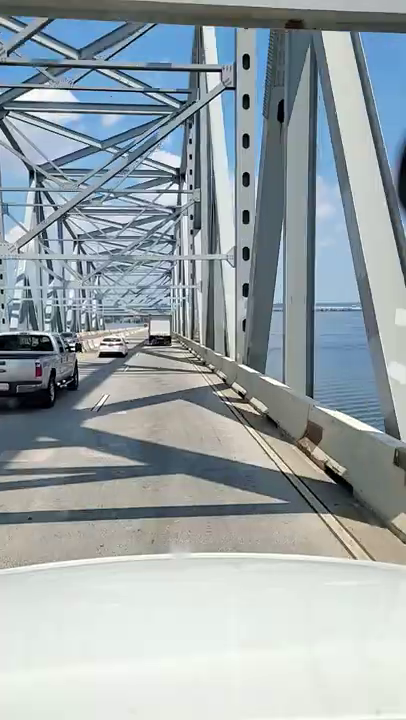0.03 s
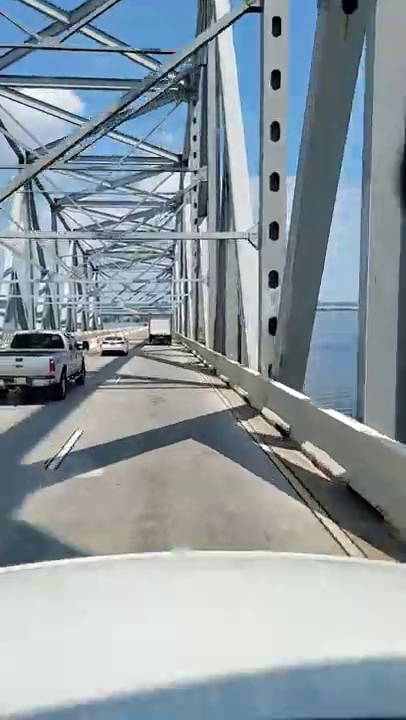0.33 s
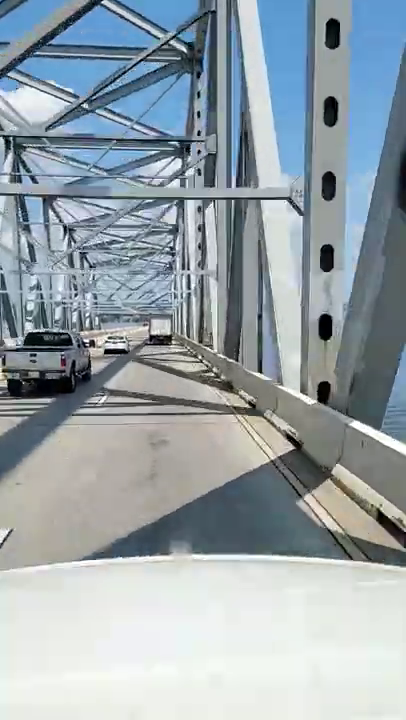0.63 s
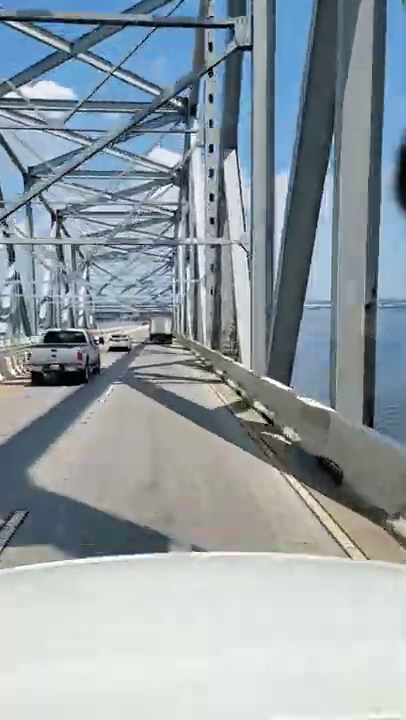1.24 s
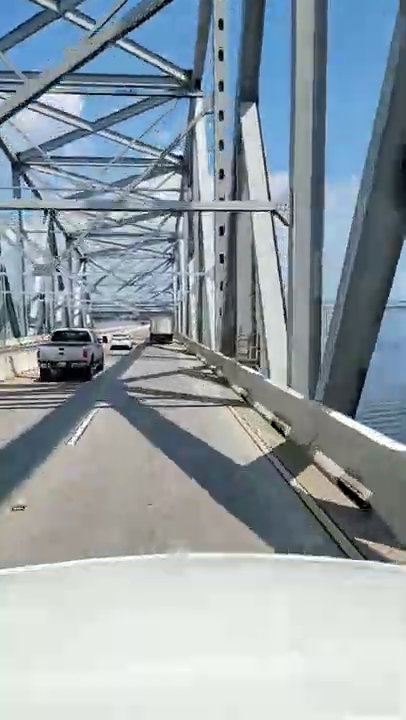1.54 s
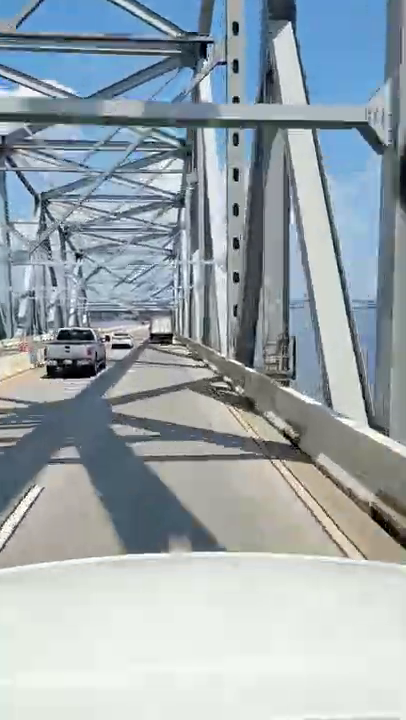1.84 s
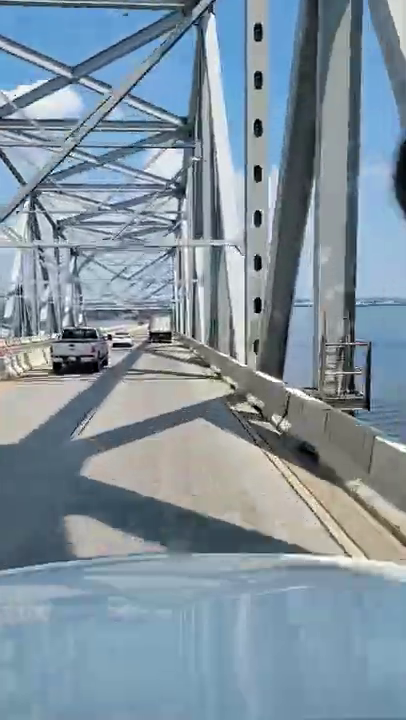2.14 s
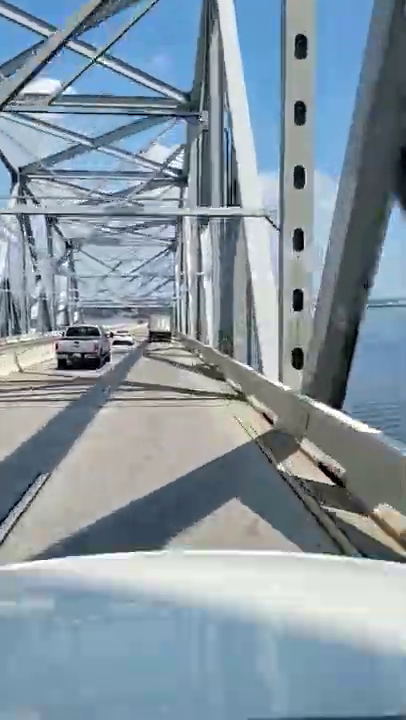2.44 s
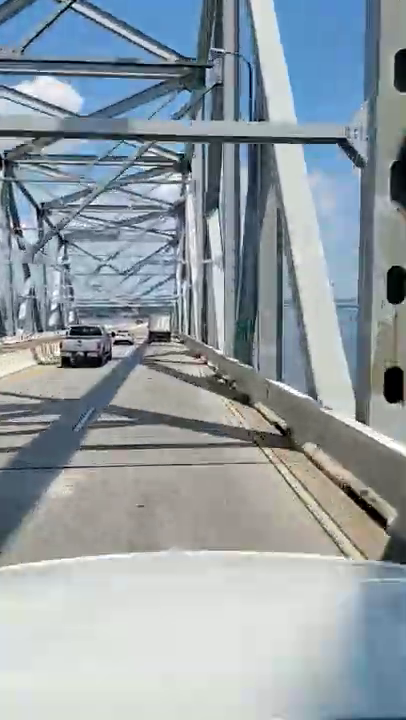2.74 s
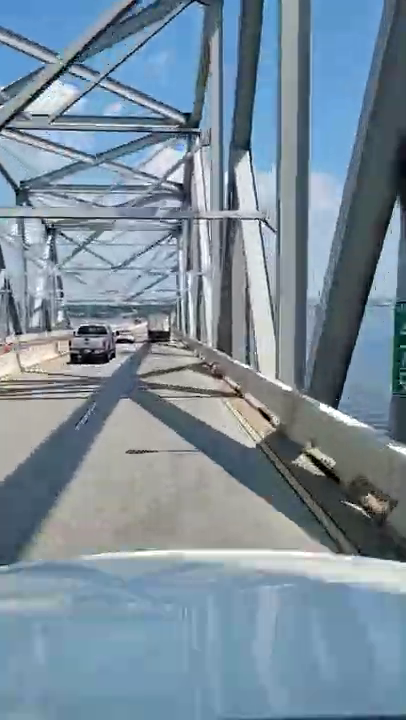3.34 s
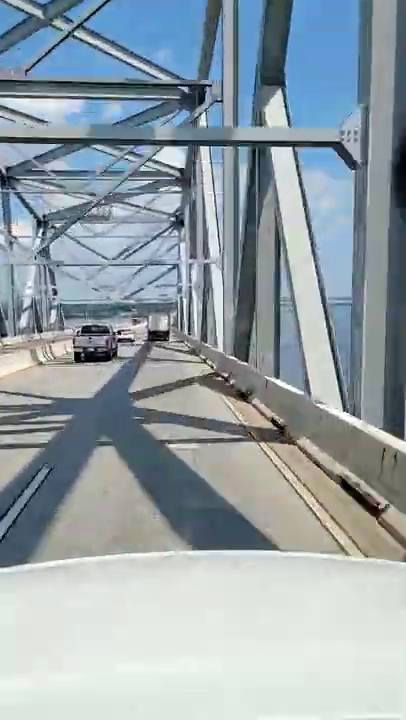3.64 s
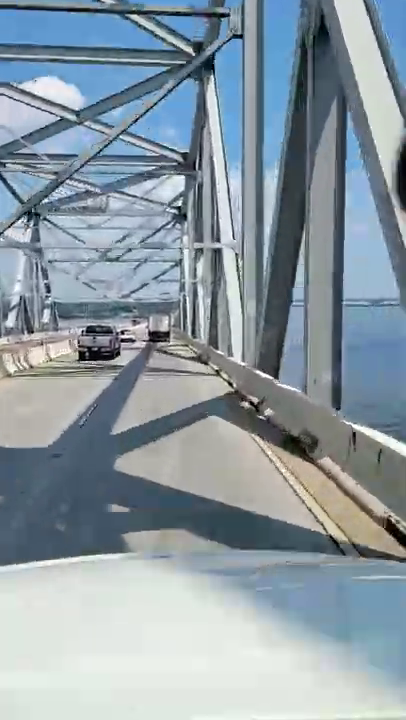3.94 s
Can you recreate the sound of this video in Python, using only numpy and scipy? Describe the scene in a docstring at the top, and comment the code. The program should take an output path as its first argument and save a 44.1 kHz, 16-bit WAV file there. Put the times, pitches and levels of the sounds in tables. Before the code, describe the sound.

From the front seat of a moving car, a low road rumble and engine drone run throughout. The tyres thump over bridge joints and hum briefly near the end, while faint swishes and small cabin clicks sit above.

```python
"""A deep road rumble and an engine drone fill a car that slowly gathers speed on a steel bridge.
The deck shakes the body through the tyres, which roar, ring faintly, hum on ribbed spots and thump
over joints; the drone follows the firing rate of the engine. Above that lie a thin hiss of air,
a run of brief swishes, soft rustles, faint clicks of the trim and one sharp tick in the cabin."""
import sys
import numpy as np
from scipy import signal
from scipy.fft import rfft, irfft
from scipy.io import wavfile
from scipy.ndimage import uniform_filter1d

SR = 44100
rng = np.random.default_rng(int(sys.argv[2]) if len(sys.argv) > 2 else 0)


def generate_wav(sig):
    """Save sig (samples, or channels by samples) to the path in sys.argv[1] as 16-bit PCM at SR."""
    pcm = np.round(np.clip(np.atleast_2d(sig).T, -1, 1) * 32767).astype(np.int16)
    wavfile.write(sys.argv[1], SR, pcm)


N = 176400
TIME = np.arange(N) / SR
HZ = np.maximum(np.arange(N // 2 + 1) * SR / N, 1)

# Cabin field, left-right coherence: f/Hz, coherence (-1..1)
COHERENCE = [(25,0.95),(60,1),(120,1),(240,1),(480,0.6),(950,-0.15),(1900,-0.19),(3800,-0.028),(15000,0.11)]
# Cabin field, balance: f/Hz, left minus right/dB
BALANCE = [(40,-3),(80,3),(150,-3.5),(250,0.5),(350,-1),(480,-4),(800,-3),(1400,-2),(2100,-4.5),(3300,0),(4000,1.5),(5100,3),(6600,0.5),(8300,6.5),(10200,-1),(15000,0)]

# Air hiss envelope: t/s, relative level/dB
HISS_LEVEL = [(0.1,-51.5),(0.35,-60),(0.64,-54.5),(0.78,-58.5),(0.92,-57.5),(1.06,-53),(1.35,-53),(2.3,-53),(3.0,-52),(3.76,-52),(3.85,-53.5),(4.0,-55.5)]
# Air hiss spectrum: f/Hz, relative level/dB
HISS_SPECTRUM = [(2000,-7),(3800,-1),(4400,-3),(4850,0),(5900,-1.5),(6600,1),(7600,-1),(9000,-3)]
# Envelope of the highest treble: t/s, level/dB
SIZZLE_LEVEL = [(0.1,-63),(0.2,-54.5),(0.27,-68),(0.45,-67.5),(0.64,-57.5),(0.76,-65),(0.87,-68),(0.94,-60),(1.05,-56),(1.15,-62),(1.75,-58.5),(1.85,-61),(2.6,-60.5),(3.2,-59),(3.7,-61),(3.82,-65),(4.0,-66)]
# Spectrum of the highest treble: f/Hz, relative level/dB
SIZZLE_SPECTRUM = [(7000,-22),(9000,-7),(10200,-2),(12000,0),(14000,-1),(15300,1)]
# Peaks and notches in hiss and swishes: f/Hz, width/Hz, gain/dB
AIR_PEAKS = [(3940,110,6.5),(4910,96,3),(5420,130,3),(6570,86,2.5),(6850,45,0.5),(7700,41,-9),(9440,57,-14)]
# Swishes: t/s, level/dB, T60/s, resonance f/Hz, boost/dB
SWISHES = [(0.690,-39.7,0.077,5050,5.5),(0.980,-36.2,0.09,7000,9),(1.230,-37.3,0.1,5000,4.5),(1.460,-49,0.14,6500,4),(1.728,-42.5,0.2,4500,3),(1.971,-44.5,0.1,6700,8),(2.202,-41.8,0.09,4800,7.5),(2.702,-39.7,0.06,5070,8),(2.888,-50.5,0.22,8000,7),(3.410,-48,0.12,7000,5),(3.639,-45,0.13,3300,7),(3.908,-44,0.087,6900,6)]
# Swish spectrum: f/Hz, relative level/dB
SWISH_SPECTRUM = [(900,-14),(2000,-0.5),(3300,-2),(5000,-2),(6800,-1),(8800,-3.5),(10500,-10.5),(15400,-10)]

# Rustles: t/s, level/dB, rise/s, T60/s, resonance f/Hz, boost/dB, left minus right/dB
RUSTLES = [(0.088,-36.5,0.049,0.24,2300,7,-18),(0.825,-41,0.0041,0.057,2500,14,-13),(1.228,-39,0.0082,0.1,2050,11,-6),(2.874,-38.7,0.03,0.28,2004,12.5,-6),(3.64,-44,0.0089,.1,2700,8,-8)]
# Rustle spectrum: f/Hz, relative level/dB
RUSTLE_SPECTRUM = [(600,5),(1500,3),(2600,-1.5),(4500,-7),(7000,-20),(10000,-37)]
# Trim clicks: t/s, level/dB, T60/s, resonance f/Hz
CLICKS = [(0.827,-42.5,0.055,2500),(1.697,-43.5,0.025,6400),(1.768,-48.5,0.025,6000)]
# Click spectrum: f/Hz, relative level/dB
CLICK_SPECTRUM = [(1500,-6),(2500,2),(6000,0),(9000,-13),(15400,-8)]
# Modes of the small part that ticks: f/Hz, relative level/dB, T60/s
TICK_MODES = [(940,-6,0.012),(1234,-3.5,0.016),(1780,-4,0.013),(1970,-10.5,0.0085),(6000,-21,0.0076),(6800,-16,0.012),(10300,-22,0.0044),(13700,-20,.008)]
# Spectrum of its crack: f/Hz, relative level/dB
CRACK_SPECTRUM = [(1000,-5),(4000,-15),(7000,-8),(15400,-16)]

# Tyre resonances: initial f/Hz, climb/(Hz/s), width/Hz, initial level/dB, growth/(dB/s)
TYRE_RINGS = [(225.1,8.5,9.4,-36,0.15),(335.1,5,22,-43.5,1),(355.7,3.5,9.5,-42.5,1.65),(408,2,5.5,-49.5,0),(461,4.1,16,-46.5,-1)]
# Tread hums: t/s, duration/s, initial f/Hz, climb/(Hz/s), level/dB
HUMS = [(2.595,0.036,244.8,0,-26),(3.195,0.056,555.2,0,-33),(3.254,0.058,358,0,-25),(3.27,0.05,485,250,-38),(3.319,0.018,530,0,-29.5),(3.345,0.045,540,300,-38),(3.59,0.05,360,0,-23)]
# Deck joints: t/s, boom level/dB, relative thud level/dB
JOINTS = [(0.377,-16,-15.5),(1.275,-9,-26),(1.377,-21,-32),(1.595,-14,-21),(1.695,-7,-22),(1.80,-11.5,-26),(1.91,-12,-29),(2.325,-19,-21),(2.375,-10.5,-17),(2.724,-16.5,-23),(2.98,-14,-20),(3.22,-18,-24),(3.335,-27,-19),(3.552,-12.5,-10),(3.612,-12,-11.5)]
# Thud spectrum: f/Hz, relative level/dB
THUD_SPECTRUM = [(50,-15),(105,12),(160,7),(250,-18),(370,-12),(600,-29),(1500,-32),(5000,-61)]
# Engine firing: t/s, f/Hz, relative level/dB
FIRING = [(0.1, 73.83, -18), (0.26, 74.05, -25), (0.41, 74.25, -17.5), (0.95, 75.04, -16.5),
          (1.41, 74.94, -15.5), (1.50, 74.53, -27.5), (1.62, 75.36, -18), (1.88, 76.45, -14),
          (2.12, 76.2, -19), (2.45, 77.6, -19), (3.0, 78.6, -20.5), (3.35, 79.4, -16), (3.7, 79.7, -23.5),
          (4.0, 79.5, -17)]
# Rough patches of road: t/s, level/dB
PATCHES = [(0.399,-33),(1.72,-34),(2.608,-31),(3.205,-35),(3.318,-28),(3.555,-33)]
# Spectrum of the growl on them: f/Hz, relative level/dB
GROWL_SPECTRUM = [(200,-25),(380,-2),(470,-2.5),(540,3.5),(620,-12),(1100,-15),(3000,-52)]
# Tyre roar envelope: t/s, relative level/dB
ROAR_LEVEL = [(0.1,-35.5),(0.45,-38.5),(0.7,-37),(1.1,-36.5),(1.45,-33.5),(1.75,-35.5),(2.0,-35.5),(2.7,-35),(3.3,-34),(3.6,-34.5),(4.0,-36.5)]
# Tyre roar spectrum: f/Hz, relative level/dB
ROAR_SPECTRUM = [(200,-3),(400,-0.5),(480,-0.5),(570,-2),(720,-1),(860,-3),(1000,-2),(1130,-10),(1450,-13.5),(1800,-15),(2060,-13),(2350,-18.5),(3200,-23.5),(4300,-30.5),(8000,-48)]
# Body rumble spectrum: f/Hz, relative level/dB
RUMBLE_SPECTRUM = [(15,-32),(24,-10),(32,-8.5),(43,1.8),(52,6),(61,1.5),(72,-8.5),(90,-6),(112,-1.5),(148,-4.7),(178,-9.5),(215,-11.5),(255,-14.5),(282,-19),(335,-14.5),(375,-19.5),(410,-28.5),(600,-38.5)]


def from_db(db):
    """Amplitude ratio: tenfold for every 20 dB."""
    return 10 ** (np.asarray(db) / 20)


def rms_one(x):
    """Normalisation to unit mean power."""
    return x / np.sqrt(np.mean(x ** 2) + 1e-20)


def in_time(rows):
    """Linear interpolation of each column over time."""
    times, *columns = np.transpose(rows)
    return [np.interp(TIME, times, column) for column in columns]


def over_hz(points):
    """Interpolation over logarithmic frequency."""
    hz, value = np.transpose(points)
    return np.interp(np.log(HZ), np.log(hz), value)


def pan(db):
    """Constant-power gains for a level difference, left minus right."""
    gains = from_db([[db / 2], [-db / 2]])
    return gains / np.sqrt(np.mean(gains ** 2))


def drift(rate_hz):
    """Random fluctuation: low-passed noise of unit power."""
    return rms_one(irfft(rfft(rng.standard_normal(N)) / (1 + (HZ / rate_hz) ** 2), N))


def burst(start, rise, t60, hold=0):
    """Envelope of a damped transient: smooth rise, optional hold, exponential decay."""
    age = TIME - start
    attack = np.sin(np.pi / 2 * np.clip(age / rise, 0, 1))
    return attack * np.exp(-np.log(1000) * np.clip((age - rise - hold) / t60, 0, 2))


def peak(hz, width, db):
    """Gain of a resonance or notch, Lorentzian in decibels."""
    return from_db(db / (1 + (2 * (HZ - hz) / width) ** 2))


def resonate(spectrum, hz, width_hz, boost_db):
    """Resonant filtering: a spectrum with one band raised, as a signal of unit power."""
    return rms_one(irfft(spectrum * peak(hz, width_hz, boost_db), N))


def steadied(x, share, span_s):
    """Compression: a share of the swings in short-term level is evened out."""
    power = uniform_filter1d(np.mean(x ** 2, axis=0), int(span_s * SR))
    return rms_one(x / np.maximum(power, 1e-9) ** (share / 2))


def cabin_noise(spectrum, colour=1, left_lag_s=0.00017, skirt_db_per_octave=36):
    """Partly coherent noise field: alike at both ears in the bass, diffuse in the treble."""
    mid, side = np.exp(2j * np.pi * rng.random((2, len(HZ))))
    coherence = over_hz(COHERENCE)
    field = np.sqrt(1 + coherence) * mid + np.sqrt(1 - coherence) * side * [[1], [-1]]
    lag = np.exp(-2j * np.pi * HZ * left_lag_s * [[1], [0]])
    balance = from_db(over_hz(BALANCE) * [[0.5], [-0.5]])
    balance /= np.sqrt(np.mean(balance ** 2, axis=0))
    skirt_db = skirt_db_per_octave * np.log2(np.maximum(HZ / spectrum[-1][0], 1))
    return rms_one(irfft(field * lag * colour * from_db(over_hz(spectrum) - skirt_db) * balance, N))


def air():
    """Filtered broadband noise: a thin hiss of air, and swishes with a resonance each."""
    colour = np.prod([peak(*row) for row in AIR_PEAKS], axis=0)
    hiss = from_db(in_time(HISS_LEVEL)[0] - 1.5) * cabin_noise(HISS_SPECTRUM, colour)
    sizzle = from_db(in_time(SIZZLE_LEVEL)[0]) * cabin_noise(SIZZLE_SPECTRUM)
    rush = rfft(cabin_noise(SWISH_SPECTRUM, colour))
    swishes = 0
    for start, db, t60, hz, boost_db in SWISHES:
        envelope = from_db(db) * burst(start, rise=0.0049, t60=t60, hold=0.0062)
        swishes += envelope * resonate(rush, hz, width_hz=900, boost_db=boost_db)
    return hiss + sizzle + swishes


def clicks():
    """Impulsive excitation of the trim: faint dry clicks with one resonance each."""
    snap = rfft(cabin_noise(CLICK_SPECTRUM))
    return sum(from_db(db) * burst(start, 0.0015, t60) * resonate(snap, hz, width_hz=500, boost_db=13)
               for start, db, t60, hz in CLICKS)


def rustles():
    """Soft noise bursts on the right; a strong narrow resonance makes one almost a creak."""
    rub = rfft(cabin_noise(RUSTLE_SPECTRUM))
    out = 0
    for start, db, rise, t60, hz, boost_db, pan_db in RUSTLES:
        envelope = from_db(db) * burst(start, rise, t60)
        out += pan(pan_db) * envelope * resonate(rub, hz, width_hz=200, boost_db=boost_db)
    return out


def tick(start=1.533, contact_s=0.00042):
    """Free vibration: a small hard part snaps with a crack and rings in well-damped modes."""
    age = np.maximum(TIME - start, 0)
    modes = sum(from_db(db - 60 * np.minimum(age / t60, 2)) * np.sin(2 * np.pi * hz * age)
                for hz, db, t60 in TICK_MODES)
    ring = from_db(-14) * np.minimum(age / contact_s, 1) * modes
    crack = from_db(-32) * burst(start, rise=0.00081, t60=0.024) * cabin_noise(CRACK_SPECTRUM)
    return (ring + crack) * pan(db=-13)


def tyre_rings():
    """Random excitation by the road drives narrow tyre resonances that climb with speed."""
    out = 0
    for hz, climb, width, db, growth in TYRE_RINGS:
        phase = 2 * np.pi * np.cumsum(hz + climb * TIME) / SR
        narrow_band = drift(width / 2) * np.cos(phase) + drift(width / 2) * np.sin(phase)
        out += from_db(db + growth * TIME) * narrow_band
    return out * pan(db=-0.8)


def tyre_hums(roughness_db=2.5):
    """Periodic forcing of the tread on ribbed spots gives rough tones that swell and fade."""
    out = 0
    for start, length, hz, climb, db in HUMS:
        age = np.clip(TIME - start, 0, length)
        tone = np.sqrt(2) * np.sin(2 * np.pi * (np.cumsum(hz + climb * age) / SR + rng.random()))
        out += from_db(db) * np.sin(np.pi * age / length) * tone
    return out * from_db(roughness_db * drift(70)) * pan(db=-2.5)


def engine(waver_db=2.1):
    """Periodic firing gives a pure drone at the firing rate, wavering in level."""
    hz, level_db = in_time(FIRING)
    drone = np.sqrt(2) * np.sin(2 * np.pi * (np.cumsum(hz) / SR + rng.random()))
    return drone * from_db(level_db - 2.3 + waver_db * drift(19)) * pan(db=-1.54)


def joints(boom_hz=50.84, wander_hz=1.934):
    """Impact excitation: each joint gives a dull thud and swells a low resonance of the body."""
    body_mode = np.sin(2 * np.pi * np.cumsum(boom_hz + wander_hz * drift(1.75)) / SR)
    boom = sum(from_db(db) * burst(start, rise=0.033, t60=0.26) for start, db, _ in JOINTS)
    thud = sum(from_db(db - 3) * burst(start, rise=0.0071, t60=0.35) for start, _, db in JOINTS)
    return boom * body_mode + thud * cabin_noise(THUD_SPECTRUM)


def road(rumble_flutter_db=0.82, roar_flutter_db=0.98):
    """Forced vibration: body rumble and tyre roar swell with the surface; rough patches growl."""
    level_db, = in_time(ROAR_LEVEL)
    swell_db = level_db - level_db.mean()
    rumble_gain = from_db(-19 + 0.52 * swell_db + rumble_flutter_db * drift(6.8))
    rumble = rumble_gain * steadied(cabin_noise(RUMBLE_SPECTRUM), share=0.46, span_s=0.097)
    roar = from_db(level_db + 1.28 + roar_flutter_db * drift(11)) * cabin_noise(ROAR_SPECTRUM)
    patches = sum(from_db(db) * burst(start, rise=0.0084, t60=0.13) for start, db in PATCHES)
    return rumble + roar + patches * cabin_noise(GROWL_SPECTRUM)


def scene():
    """Superposition of all sources at the front seat."""
    return road() + engine() + tyre_rings() + tyre_hums() + joints() + air() + rustles() + clicks() + tick()


def record(dry):
    """Gating and low-pass filtering: the sound sets in abruptly and its top is cut steeply."""
    onset_s, cutoff_hz = 0.083, 15600
    low_pass = signal.ellip(12, .1, 80, cutoff_hz, fs=SR, output="sos")
    return signal.sosfilt(low_pass, dry * (TIME >= onset_s))


dry = scene()
out = record(dry)
generate_wav(out)
```